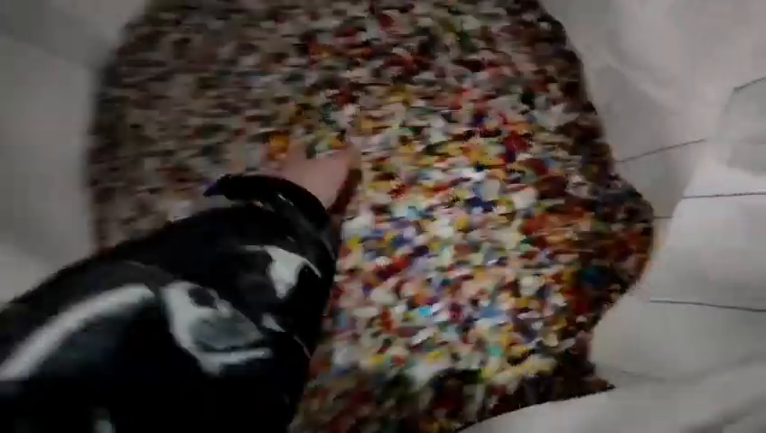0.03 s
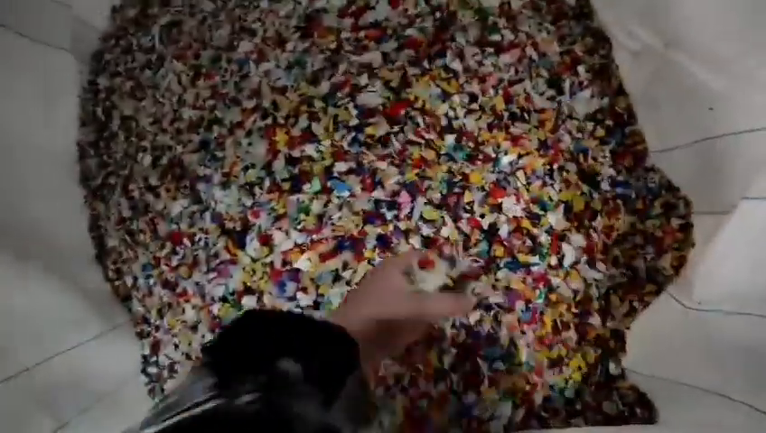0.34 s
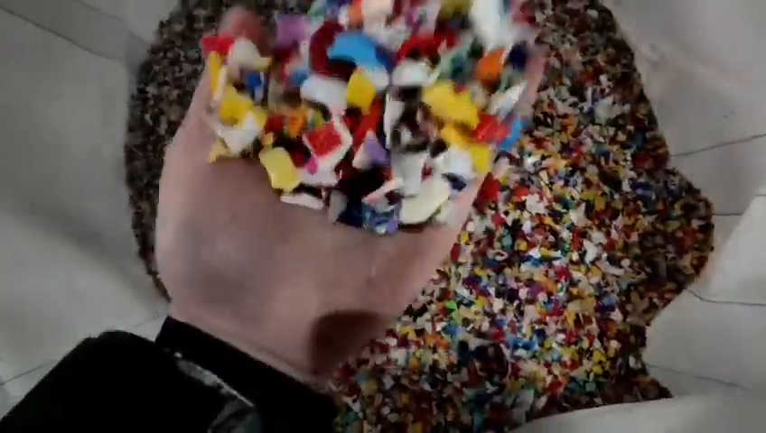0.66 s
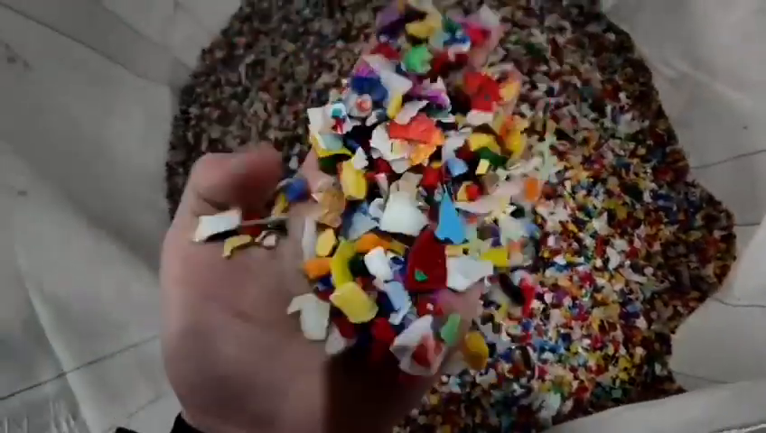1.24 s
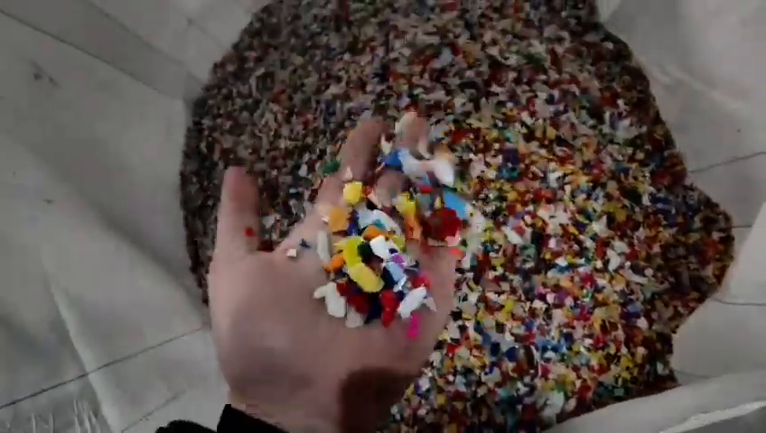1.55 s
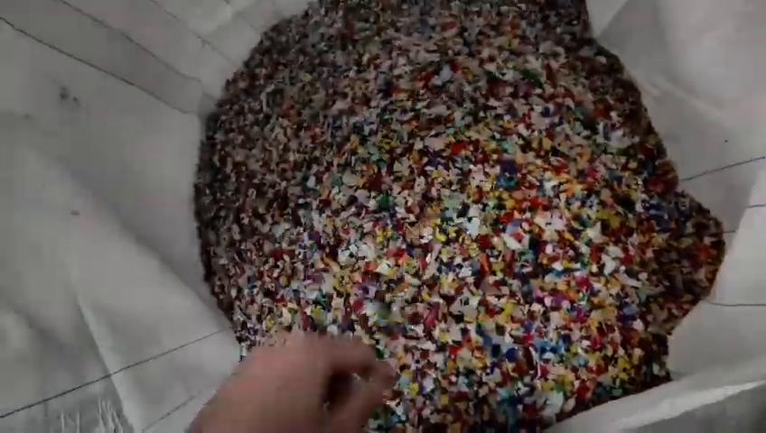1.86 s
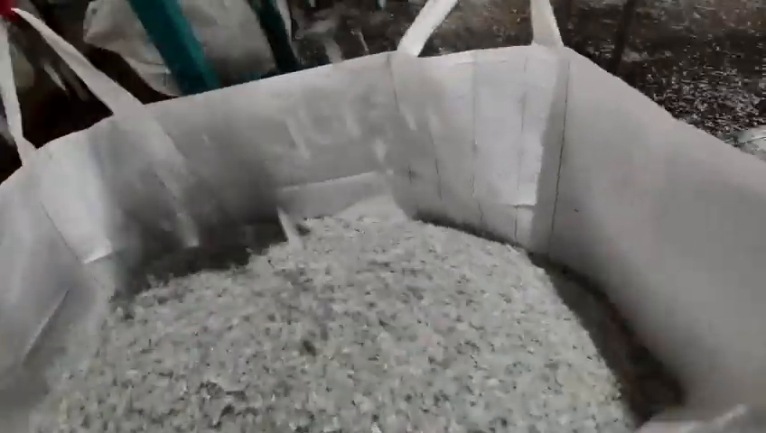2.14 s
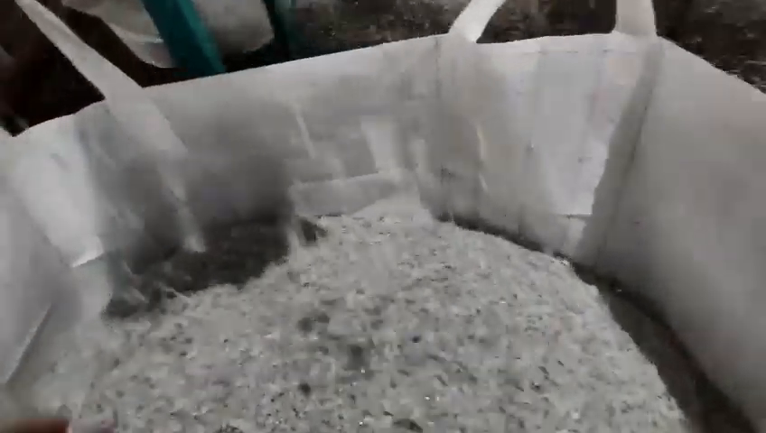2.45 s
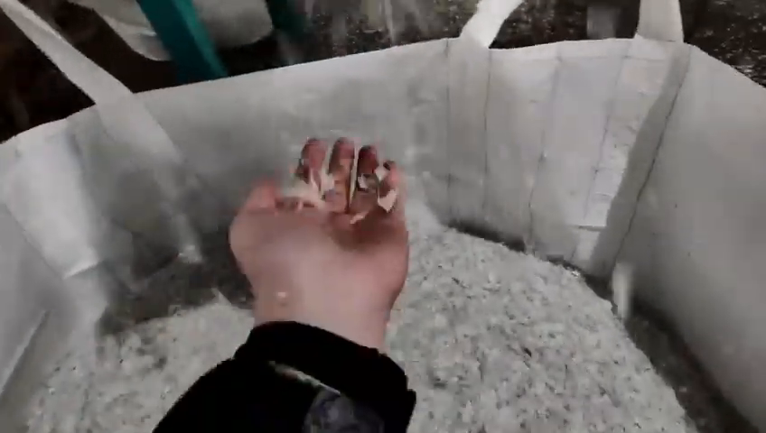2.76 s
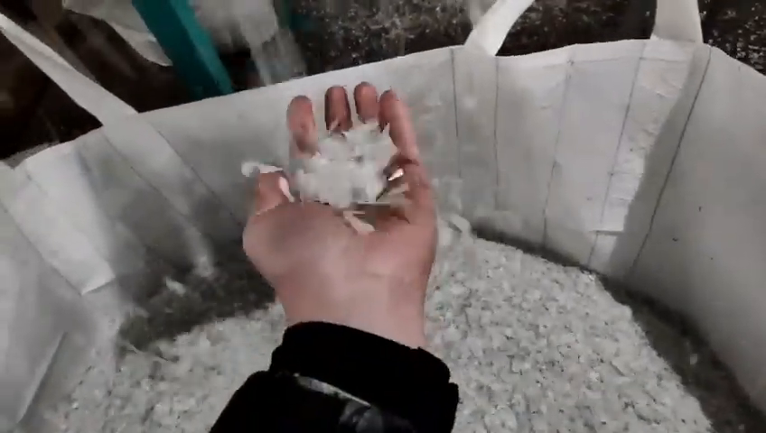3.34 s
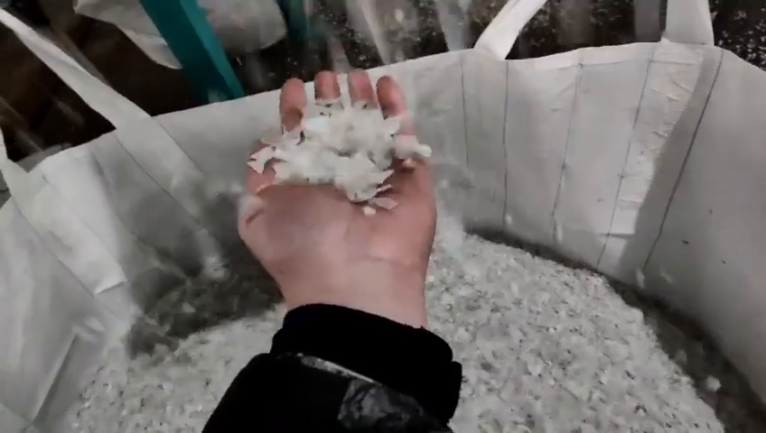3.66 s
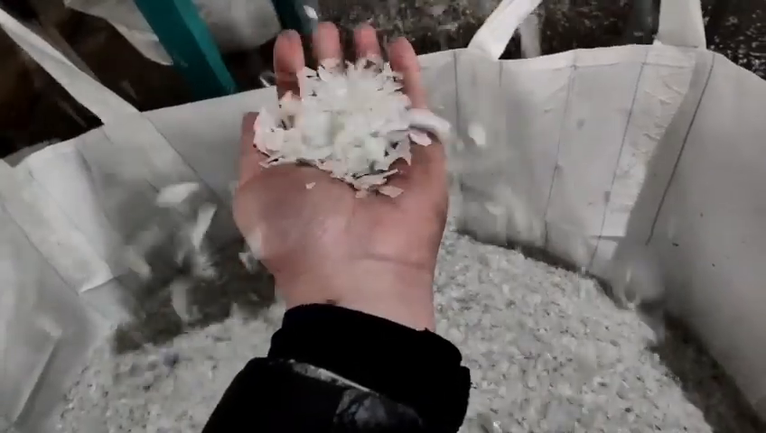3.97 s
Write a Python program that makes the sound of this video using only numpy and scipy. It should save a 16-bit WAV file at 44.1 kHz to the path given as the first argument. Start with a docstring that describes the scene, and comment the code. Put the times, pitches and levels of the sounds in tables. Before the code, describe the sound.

Heard close beside a bulk bag, a factory sorting machine gives a steady hiss of flakes, a throbbing low roar and faint air spits. Lifted flakes rustle, the sound cuts out for an instant, then resumes louder with dull pattering.

```python
"""A plastic sorting machine runs in a factory hall. First we listen beside one bulk bag: countless
flakes rush down the chutes, fans and ducts roar with brief low surges, the shaking feeder hums and
air valves spit. About half a second in, a hand lifts rustling flakes from the bag. Near two seconds
comes a short silence. Then we are beside a second bag, where the rush is louder and falling flakes
patter on the fabric and the heap."""
import sys
import numpy as np
from scipy import signal
from scipy.fft import rfft, irfft
from scipy.io import wavfile
from scipy.ndimage import uniform_filter1d, map_coordinates

SR = 44100
rng = np.random.default_rng(int(sys.argv[2]) if len(sys.argv) > 2 else 0)


def output_pcm(signal):
    """Save a mono or channel-first signal as 16-bit PCM at the path in sys.argv[1].

    Samples are clipped to [-1, 1] before scaling.
    """
    pcm = np.clip(np.atleast_2d(signal).T, -1, 1) * 32767
    wavfile.write(sys.argv[1], SR, np.round(pcm).astype(np.int16))


N = 176400
SILENCE_START_S, SILENCE_END_S, FADE_IN_S = 1.9795, 2.062, 0.0058
TOP_HZ = 12080

# Tone of the flakes rushing down the chutes, at each bag: pitch_hz, gain_db
FIRST_RUSH_TONE = [(400, -12), (700, -7), (980, -1.5), (1250, -3), (1650, -2), (2100, -2), (2800, -3.5),
                   (3250, -7), (3900, -5), (4400, -5.5), (4800, -3), (5200, -4.5), (5900, -2), (6450, -1),
                   (6800, -5), (7500, -7), (8300, -12), (9200, -12), (10500, -12.5), (12000, -13.5)]
SECOND_RUSH_TONE = [(400, -19), (700, -4.5), (1000, 0), (1400, -1.4), (1900, -2.5), (2800, -2.5),
                    (3400, -4.5), (4200, -3), (4800, -2.5), (5200, -2.8), (6000, 0), (6600, -2),
                    (7400, -4.5), (8500, -11), (9600, -9), (10400, -11), (12000, -10.7)]
# How the rush rises and falls, at each bag: time_s, gain_db
FIRST_RUSH_LEVEL = [(0, -37.5), (.3, -38.5), (.46, -39), (.7, -38.5), (1.02, -38.5), (1.2, -38.5),
                    (1.55, -38), (1.76, -37.5), (1.97, -39.5)]
SECOND_RUSH_LEVEL = [(2.07, -35), (2.23, -34.5), (2.38, -34), (2.52, -35), (2.8, -34), (3.1, -34.5),
                     (3.34, -33.5), (3.55, -33.5), (3.8, -34), (4, -33.5)]
# Lift or cut of the lower part of the rush: time_s, gain_db
RUSH_BODY = [(0, -3), (.25, -2), (.6, -1.1), (.9, -2), (1.35, 0.1), (1.7, -1.9), (1.97, 1.2), (2.07, 1),
             (2.25, -2.5), (2.4, 1.1), (2.8, 0.5), (3.1, 0.3), (3.4, 0.5), (3.75, 2.2), (4, -0.3)]
# Tone of the roaring fans and ducts, at each bag: pitch_hz, gain_db
FIRST_ROAR_TONE = [(11, -51), (18, -40), (48, -6), (107, -7.5), (142, 0), (189, -5), (218, 1.5), (251, -8),
                   (304, -8), (385, -10), (452, -13), (800, -27.5), (1040, -37), (1760, -120)]
SECOND_ROAR_TONE = [(11, -56), (18, -18), (42, -12), (108, -2), (146, -4.5), (185, -4.5), (255, -2.5),
                    (314, -9.5), (345, -8), (373, -12.5), (438, -10), (538, -15.5), (601, -14),
                    (800, -22.5), (1040, -30), (1760, -120)]
# How roar and hum rise and fall together: time_s, gain_db
MACHINE_LEVEL = [(0, 0), (.25, 0), (.45, 1.5), (.65, -0.7), (.98, -.5), (1.2, 0.2), (1.33, -0.5),
                 (1.62, -.5), (1.85, -0.7), (2.15, 0), (2.45, -0.5), (2.65, -1.5), (2.85, 1), (3.03, -1),
                 (3.35, -0.1), (3.73, -0.1), (4, -2)]
# Brief low surges in the machine's roar: peak_time_s, pitch_hz, peak_level_db
RUMBLE_SURGES = [(.135, 220, -23), (.263, 217, -27), (.355, 339, -28), (.405, 62, -29), (.459, 145, -25),
                 (.563, 229, -22), (.635, 219, -26), (0.692, 158, -27), (0.886, 150, -24), (.99, 60, -26),
                 (1.083, 215, -24.5), (1.199, 195, -24), (1.21, 393, -29), (1.402, 150, -21.5),
                 (1.454, 150, -28.5), (1.679, 155, -27), (1.782, 146, -23.5), (1.84, 166, -25),
                 (1.89, 403, -31.5), (2.076, 111, -25.5), (2.16, 245, -29), (2.316, 232, -27),
                 (2.389, 114, -21.5), (2.426, 254.3, -26.5), (2.476, 111, -25), (2.544, 245, -28.5),
                 (2.689, 225, -24), (2.79, 265, -24.5), (2.823, 126, -22), (2.89, 205, -25.5),
                 (2.96, 242, -28.5), (3.171, 253, -21.5), (3.27, 215, -22.5), (3.343, 118, -27),
                 (3.379, 228, -23), (3.42, 119, -25), (3.591, 109, -25), (3.729, 194, -23.5),
                 (3.735, 104, -25), (3.8, 66, -26)]
# Humming notes of the feeder and fans: pitch_hz, first_bag_gain_db, second_bag_gain_db
HUM_NOTES = [(59.3, -41.5, -43), (120, -59, -40.5), (223.8, -42.5, -40.5), (251.7, -45.5, -42.5)]
# Strength of the patter in the second bag: time_s, gain_db
PATTER_LEVEL = [(2.07, -6), (2.28, -6), (2.34, 3), (2.45, -1), (2.54, -0.5), (4, 0)]
# Tone of the flakes in the hand: pitch_hz, gain_db
RUSTLE_TONE = [(1200, -17), (1600, -2.5), (1850, -3.5), (2100, -1.5), (2400, -11), (2700, -2), (3200, -12)]
# Their rustle as the hand lifts them: time_s, level_db
RUSTLE_LEVEL = [(.42, -62), (.58, -42), (.65, -41), (.69, -36.5), (.74, -43), (.82, -64)]
# Echo from the moving arm and the bag wall: time_s, delay_ms, gain (0 to 1)
ARM_ECHO = [(0, 0.32, 0), (.15, 0.32, 0.3), (.35, .42, 0.04), (.65, 0.48, 0), (.92, 0.28, 0.07),
            (1.12, .68, .2), (1.4, 0.5, 0.07), (1.6, 0.77, 0.07), (1.8, 0.4, 0.18), (2.07, 0.24, 0.04),
            (2.3, 0.25, 0), (2.48, 1.07, .08), (2.68, 0.82, 0.22), (2.95, 0.73, 0.06), (3.2, 0.69, 0.03),
            (3.36, 0.61, 0.1), (3.5, 0.38, 0.17), (3.7, 0.5, 0.07), (4, 0.71, 0.2)]
# Ringing (+) or hollow (-) moments as the hand moves: middle_s, half_length_s, pitch_hz, gain_db
RINGS_AND_HOLLOWS = [(.62, .07, 6350, 2), (.68, 0.16, 3450, -3), (1.21, .05, 6500, 4),
                     (1.32, .06, 8300, -4), (1.43, .05, 5950, 6), (1.622, 0.057, 1650, 5),
                     (2.12, 0.1, 3380, 2.5), (2.378, .07, 5900, 4.5), (2.72, 0.12, 4250, -2),
                     (3.22, 0.099, 2800, 5.5), (3.3, .2, 3440, -2), (3.34, .07, 6150, 4.5),
                     (3.33, 0.1, 1850, 4.5), (3.7, .1, 3100, -2), (3.58, 0.043, 2680, 4.5),
                     (3.77, 0.055, 1360, 5.5), (3.97, .1, 2770, 3.5)]


def flake_rush(tone, level, boost_db):
    """Countless flakes collide and slide down the chutes, making tiny ticks over a hiss."""
    ticks = hall(impacts(per_s=9000, spread_db=3) * rng.choice([-1, 1], N))
    tick_share, body_top_hz = 0.32, 2190
    flow = np.sqrt(tick_share) * ticks + np.sqrt(1 - tick_share) * rng.standard_normal(N)
    flow = unit(shape_tone(flow, tone))
    flow = flow + (gain(curve(RUSH_BODY)) - 1) * low_pass(flow, body_top_hz)
    out = 0
    for hz in (1000, 2000, 4000, 8000):  # peel off the octaves and let each one flicker
        low = low_pass(flow, hz)
        out = out + low * gain(0.66 * wander(rate_hz=25))
        flow = flow - low
    surge_db = 0.4 * wander(rate_hz=15)
    return (out + flow) * gain(boost_db + curve(level) + surge_db)


def fan_roar(tone):
    """Air swirls in fans and ducts. It throbs quickly while its loudness stays nearly steady."""
    air = rng.standard_normal(N) * gain(1.06 * wander(rate_hz=26))
    air = shape_tone(air, tone)
    power = uniform_filter1d(air ** 2, int(0.099 * SR))
    return gain(-27) * unit(air / power ** 0.495)  # even out the slower swells


def rumble_surges(rise_s=0.015, fall_s=0.022):
    """Brief low surges in the machine's roar. Each swells and dies within a few vibrations."""
    t, out = np.arange(N) / SR, np.zeros(N)
    drift = np.cumsum(9.01 * wander(rate_hz=30)) / SR  # the pitch strays by about 9 Hz
    for (peak_s, hz, db), phase in zip(RUMBLE_SURGES, rng.random(len(RUMBLE_SURGES))):
        near = np.abs(t - peak_s) < 4 * fall_s
        age = t[near] - peak_s
        swell = np.exp(-(age / np.where(age < 0, rise_s, fall_s)) ** 2)
        out[near] += gain(db) * swell * np.sin(2 * np.pi * (hz * age + drift[near] + phase))
    return out


def machine_hum(stray_hz=3.24, waver_db=2):
    """The feeder and fans vibrate with low, wavering notes. Gives one sound for each bag."""
    out = np.zeros((2, N))
    for hz, first_db, second_db in HUM_NOTES:
        phase = 2 * np.pi * np.cumsum(hz + stray_hz * wander(rate_hz=12)) / SR
        note = unit(np.sin(phase) * gain(waver_db * wander(rate_hz=6.9)))
        out += gain([[first_db], [second_db]]) * note
    return out


def flake_patter():
    """Falling flakes tap dully on the bag's fabric and on the heap."""
    taps = bursts(impacts(per_s=260, spread_db=3), decay_s=0.0015)
    return gain(-40 + curve(PATTER_LEVEL)) * unit(band_pass(taps, hz=1110, octaves=2.3))


def hand_rustle():
    """A handful of flakes scrape and click against each other."""
    scrapes = bursts(impacts(per_s=800, spread_db=0), decay_s=0.0029)
    return unit(shape_tone(scrapes, RUSTLE_TONE)) * gain(curve(RUSTLE_LEVEL))


def air_valves():
    """Valves inside the machine spit short puffs of air at random moments."""
    puffs = bursts(impacts(per_s=100, spread_db=3.5), decay_s=0.004)
    return gain(-43) * hall(band_pass(puffs, hz=2240, octaves=2.65))


def close_echoes(x, fold_ms=1.3, sway_ms=0.1):
    """Sound bounces off the arm and bag, strengthening some pitches and weakening others."""
    arm = np.array(ARM_ECHO)
    arm_ms, arm_gain = curve(arm[:, [0, 1]]), curve(arm[:, [0, 2]])
    out = x + arm_gain * delay(low_pass(x, hz=4500, order=2), arm_ms)
    for fold in (1, 2, 3):  # weak echoes from the bag's folds shift as the listener sways
        out = out + gain(-20) * delay(x, fold_ms * fold + sway_ms * wander(rate_hz=3.8))
    return out


def rings_and_hollows(x, width_hz=170):
    """Narrow ranges of pitch briefly ring out or sink away."""
    t, f = np.arange(N) / SR, np.arange(N // 2 + 1) * SR / N
    out, spectrum = x, rfft(x)
    for middle_s, half_length_s, hz, db in RINGS_AND_HOLLOWS:
        part = irfft(spectrum * np.exp(-((f - hz) / width_hz) ** 2), N)
        swell = np.exp(-((t - middle_s) / half_length_s) ** 2)
        out = out + part * (gain(db * swell) - 1)
    return out


def shimmer(x, width_hz=500, flicker_db=1):
    """Narrow ranges of pitch flicker, each on its own."""
    f, spectrum = np.arange(N // 2 + 1) * SR / N, rfft(x)
    out = 0
    for hz in np.arange(0, TOP_HZ + 2 * width_hz, width_hz):
        part = irfft(spectrum * np.maximum(1 - np.abs(f - hz) / width_hz, 0), N)
        out = out + part * unit(gain(flicker_db * wander(rate_hz=16)))
    return out


def hall(x, ring_s=0.75):
    """The hall adds a wash of echoes that fades by 60 dB in ring_s."""
    t = np.arange(SR) / SR
    tail = rng.standard_normal(SR) * np.exp(-np.log(1000) * t / ring_s)
    echoes = signal.fftconvolve(x, tail / np.linalg.norm(tail))[:N]
    return unit(x + gain(-2.5) * echoes)


def impacts(per_s, spread_db):
    """Clicks at random moments. A wider spread makes a few of them stand out."""
    return (rng.random(N) < per_s / SR) * gain(spread_db * np.minimum(rng.exponential(size=N), 4))


def bursts(clicks, decay_s):
    """Each click starts a quickly dying burst of noise."""
    energy = signal.lfilter([1], [1, -np.exp(-2 / (decay_s * SR))], clicks ** 2)
    return np.sqrt(energy) * rng.standard_normal(N)


def shape_tone(x, points):
    """Turn pitches up or down by (pitch_hz, gain_db) points, fading steeply past both ends."""
    f = np.maximum(np.arange(N // 2 + 1) * SR / N, 1)
    hz, db = np.array(points).T
    edge_fade = np.minimum(f / hz[0], 1) ** 2 * np.minimum(hz[-1] / f, 1) ** 2
    return irfft(rfft(x) * edge_fade * gain(np.interp(np.log(f), np.log(hz), db)), N)


def band_pass(x, hz, octaves):
    """Keep the pitches around hz."""
    edges = [hz / 2 ** (octaves / 2), hz * 2 ** (octaves / 2)]
    return signal.sosfilt(signal.butter(2, edges, "band", fs=SR, output="sos"), x)


def low_pass(x, hz, order=3):
    """Keep the pitches below hz."""
    return signal.sosfiltfilt(signal.butter(order, hz, fs=SR, output="sos"), x)


def delay(x, ms):
    """Make a sound arrive later by a changing number of milliseconds."""
    return map_coordinates(x, [np.arange(N) - ms * SR / 1000], order=3, mode="mirror")


def wander(rate_hz):
    """Smooth random motion with a typical size of 1."""
    f = np.arange(N // 2 + 1) * SR / N
    return unit(irfft(rfft(rng.standard_normal(N)) / (1 + (2 * f / rate_hz) ** 4), N))


def curve(rows):
    """Join (time_s, value) rows with straight lines."""
    return np.interp(np.arange(N) / SR, *np.array(rows).T)


def gain(db):
    """Turn decibels into a number to multiply by."""
    return 10 ** (np.asarray(db) / 20)


def unit(x):
    """Scale to an average power of 1."""
    return x / np.sqrt(np.mean(x ** 2))


def scene():
    """The first bag, a short silence, then the second bag; the same in both ears."""
    t = np.arange(N) / SR
    at_first = t < SILENCE_START_S
    at_second = np.clip((t - SILENCE_END_S) / FADE_IN_S, 0, 1) ** 2
    first_hum, second_hum = machine_hum()
    machine = at_first * (fan_roar(FIRST_ROAR_TONE) + first_hum)
    machine += at_second * (fan_roar(SECOND_ROAR_TONE) + second_hum)
    first_flakes = flake_rush(FIRST_RUSH_TONE, FIRST_RUSH_LEVEL, boost_db=7.5)
    second_flakes = flake_rush(SECOND_RUSH_TONE, SECOND_RUSH_LEVEL, boost_db=5) + flake_patter()
    flakes = np.where(at_first, first_flakes, second_flakes)
    hiss = rings_and_hollows(close_echoes(flakes + air_valves()))
    sorting = rumble_surges() + hand_rustle() + shimmer(hiss)
    mono = machine * gain(curve(MACHINE_LEVEL)) + sorting * (at_first + at_second)
    return np.array([mono, mono])


def record(dry):
    """Cut away the treble above TOP_HZ steeply."""
    return signal.sosfilt(signal.ellip(12, .1, 80, TOP_HZ, fs=SR, output="sos"), dry)


dry = scene()
out = record(dry)
output_pcm(out)
```